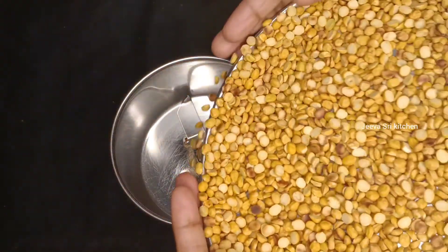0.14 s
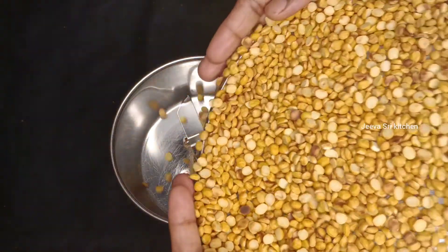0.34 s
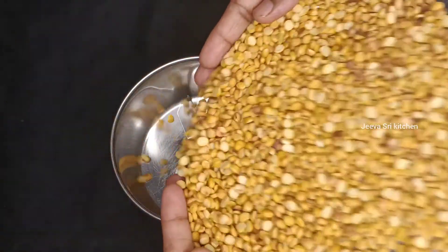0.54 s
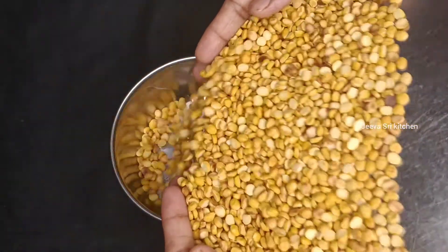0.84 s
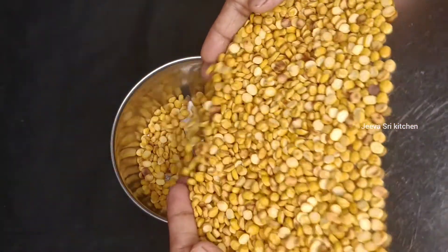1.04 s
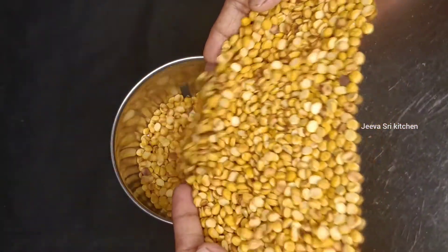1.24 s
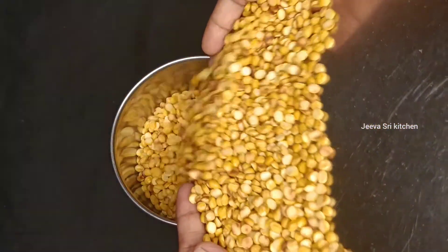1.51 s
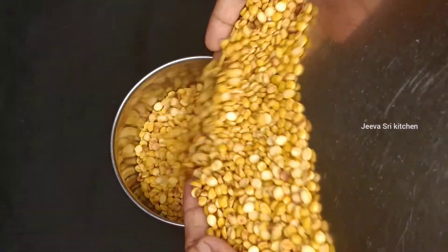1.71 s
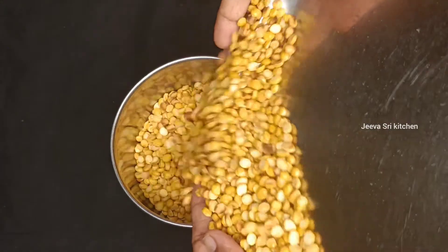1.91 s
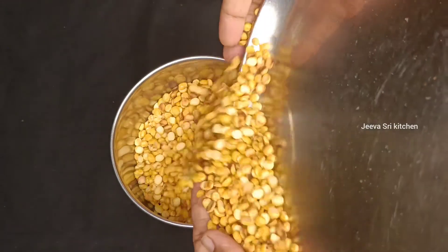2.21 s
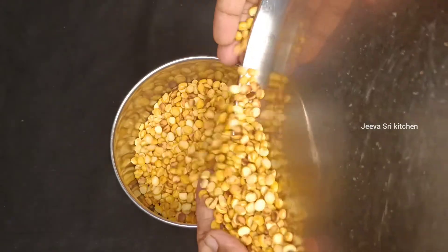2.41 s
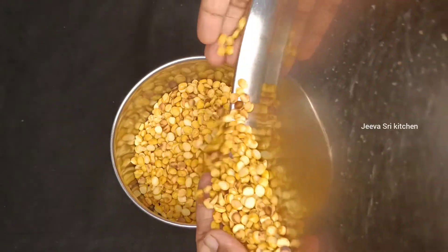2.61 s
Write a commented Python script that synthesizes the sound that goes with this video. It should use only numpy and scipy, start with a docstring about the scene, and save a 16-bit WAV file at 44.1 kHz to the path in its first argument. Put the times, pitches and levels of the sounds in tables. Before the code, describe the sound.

A close stereo pickup of dried lentils pouring into a bare metal jar in a quiet kitchen, starting with muffled counter bumps and scattered sharp clicks, swelling to a hissing, ringing rush, then tapering to fewer ticks.

```python
"""Soft bumps come through a counter in a quiet kitchen, then dry lentils slide off a tilted steel
bowl into a metal jar, heard by a two-port microphone. The slide is a dense random train of noise
bursts; landing seeds make sharp ticks. The bare jar rings as decaying modes until it fills, the air
in both vessels rumbles round rising resonances, and the bumps excite the counter's low modes.
Diffuse tails of decaying noise supply the echoes."""
import sys
import numpy as np
from scipy import signal
from scipy.fft import rfft, irfft, next_fast_len
from scipy.io import wavfile
from scipy.ndimage import uniform_filter1d

SR = 44100
rng = np.random.default_rng(int(sys.argv[2]) if len(sys.argv) > 2 else 0)


def makeup_ratio(level_db):
    """Linear amplitude ratio for a level in decibels (20 dB per factor of ten)."""
    decades = np.asarray(level_db, float) / 20
    return 10 ** decades


def digitize_waveform(pressure):
    """Quantize a signal to 16-bit integers and store it at the path in sys.argv[1].

    Rows of a 2-D input are taken as channels; values are limited to [-1, 1].
    """
    field = np.atleast_2d(pressure).T
    bounded = np.clip(field, -1, 1)
    quanta = np.round(bounded * 32767).astype(np.int16)
    wavfile.write(sys.argv[1], SR, quanta)


N = 121275  # samples


def evened(x):
    """Normalisation: scales a signal to unit rms."""
    return x / np.sqrt(np.mean(x ** 2) + 1e-20)


def curve(table, column):
    """Amplitude envelope: gain over time interpolated from one dB column."""
    table = np.array(table)
    return makeup_ratio(np.interp(np.arange(N) / SR, table[:, 0], table[:, column]))


def read(points, hz, column=1):
    """Spectral interpolation along a logarithmic frequency axis."""
    points = np.array(points)
    return np.interp(np.log(hz + 1), np.log(points[:, 0] + 1), points[:, column])


def drift(size):
    """Low-pass random modulation, smooth over size x 100 samples."""
    slow = evened(uniform_filter1d(rng.standard_normal(N // 100 + 2), size))
    return np.interp(np.arange(N) / 100, np.arange(len(slow)), slow)


def add(out, s, db, part):
    """Superposition: mixes in a short sound scaled to a peak level."""
    start = round(s * SR)
    out[:, start:start + part.shape[1]] += makeup_ratio(db) * part / abs(part).max()


# Relative colour of the two ports: pitch_hz [Hz], left_db [dB], right_db [dB]
PORT_COLOUR = [(300, -28, -26), (800, -22, -20), (1400, -26, -24), (2000, -19, -23), (2900, -15, -15),
               (4300, -17, -21), (5500, -13, -16), (6700, -8, -23), (7300, -12, -15), (8000, -22, -6),
               (9300, -20, -8), (10200, -10, -9), (12000, -14, -9), (12700, -6, -9), (13900, -1, -14),
               (15100, 0, -19), (15750, -2, -36)]


def coloured(x, tilt):
    """Minimum-phase filtering: the port colour plus the source's own tilt, causal in each channel."""
    hz = abs(np.fft.fftfreq(2048, 1 / SR))
    level_db = np.array([read(PORT_COLOUR, hz, column=c) + read(tilt, hz) for c in (1, 2)])
    log_gain = np.log(makeup_ratio(level_db))
    # The Hilbert transform of the log gain supplies the minimum phase.
    spectrum = np.exp(np.conj(signal.hilbert(log_gain)))
    taps = np.fft.ifft(spectrum).real[:, :1024]
    return signal.oaconvolve(x, taps, axes=1)[:, :N]


def strikes(per_s, spread_db):
    """Random impulse process: sparse clicks of random sign, sizes spread exponentially in dB."""
    size = makeup_ratio(spread_db * np.minimum(rng.exponential(1, N), 4))
    return size * rng.choice([-1., 1.], N) * (rng.random(N) < per_s / SR)


ALIKE = 0.47  # weight of the noise shared by both ports of a burst (left-right correlation about 0.22)
RISE_S = 0.00021  # rise time constant: a seed lands with a tiny scatter


def bursts(t60, count):
    """Exponential decay: noise bursts of unit energy per port, each with its own bumpy colour."""
    t = np.arange(1200) / SR
    noise = rng.standard_normal((count, 3, 1200))
    ports = ALIKE * noise[:, :1] + np.sqrt(1 - ALIKE ** 2) * noise[:, 1:]
    decay_s = t60 * rng.uniform(0.7, 1.8, (count, 1, 1))
    ports = ports * makeup_ratio(-60 * t / decay_s) * (1 - np.exp(-t / RISE_S))
    return ports / np.linalg.norm(ports, axis=2, keepdims=True)


def patter(clicks, t60, tilt, count=48):
    """Convolution: each click starts one burst picked at random from a set."""
    pick = rng.integers(0, count, N)
    size = next_fast_len(N + 1200)
    spectrum = sum(rfft(clicks * (pick == k), size) * rfft(burst, size)
                   for k, burst in enumerate(bursts(t60, count=count)))
    return coloured(irfft(spectrum, size)[:, :N], tilt)


RING_T60 = 0.0096  # s; seeds damp the steel
DETUNE = .007  # largest share of pitch by which a spot rings off


def tone(hz, left_db, right_db, luck):
    """Damped modal vibration: one mode, a little detuned, with its own phase in each port."""
    t = np.arange(2000) / SR
    level = makeup_ratio(np.array([[left_db], [right_db]]) - 60 * t / RING_T60)
    pitch_hz = hz * (1 + DETUNE * (2 * luck[0] - 1))
    return level * np.sin(2 * np.pi * (pitch_hz * t + luck[1:, None]))


def ringing(clicks, modes):
    """Modal superposition: each strike drives each mode by a different amount, at six spots."""
    out = 0
    for mode in modes * 6:
        drive = (clicks * rng.standard_normal(N))[None]
        out = out + signal.oaconvolve(drive, tone(*mode, rng.random(3)), axes=1)[:, :N]
    return out


ROOM_DB = -53.5  # rms level of the murmur
# Relative spectrum of the murmur: pitch_hz [Hz], level_db [dB per Hz]
MURMUR = [(20, -1.5), (75, -12.5), (109, 5), (135, -11), (199, 3.5), (281, -13), (531, -10.5), (1800, -47)]
# Left-right likeness of the murmur, 1 = identical: pitch_hz [Hz], likeness [ratio]
MURMUR_ALIKE = [(30, 1), (100, 1), (600, 1)]


def room():
    """Stationary filtered noise: the low kitchen murmur of air and appliances."""
    hz = np.fft.rfftfreq(N, 1 / SR)
    a, b = rfft(rng.standard_normal((2, N)))
    same = np.clip(read(MURMUR_ALIKE, hz), -1, 1)
    ports = np.array([a, same * a + np.sqrt(1 - same ** 2) * b])
    return makeup_ratio(ROOM_DB) * evened(irfft(ports * makeup_ratio(read(MURMUR, hz)), N))


BUMP_RISE_S = .03
KNOCK_S, KNOCK_DB, KNOCK_WIDTH_S = .3465, -20, 0.00007  # one dull click
# Soft bumps as the bowl shifts: start_s [s], level_db [dB], brightness [dB per octave about 200 Hz]
BOWL_BUMPS = [(.005, -45, 8.5), (0.034, -37, -1), (.11, -42, 9.5), (0.149, -34, 6.5), (.18, -31.5, 3.5),
              (0.218, -38, 4.5), (.28, -44, 8.5)]
# Low modes of the counter: pitch_hz [Hz], level_db [dB against the bump], t60_s [s]
COUNTER_MODES = [(116.2, 10.5, 0.18), (176.4, -2, 0.27), (191.2, -3.5, 0.47), (232, 0.5, 0.26),
                 (311, -4.5, 0.18), (353.4, 4.5, 0.098), (402.5, 1, 0.11), (468.2, -10.5, 0.31),
                 (755, -8, 0.078)]


def counter():
    """Modal excitation: bumps swell and die in the counter's low modes; a Gaussian pulse clicks."""
    t, out = np.arange(N) / SR, np.zeros((2, N))
    port = np.array([[0], [1]])
    for (s, db, bright_db), luck in zip(BOWL_BUMPS, rng.random((10, len(COUNTER_MODES), 2))):
        u = np.clip(t[:SR] - s, 0, None)  # time since the bump
        swell = np.sin(np.pi / 2 * np.minimum(u / BUMP_RISE_S, 1)) ** 2
        for (hz, mode_db, t60), (a, b) in zip(COUNTER_MODES, luck):
            level = makeup_ratio(db + mode_db + bright_db * np.log2(hz / 200) - 60 * u / t60) * swell
            # The ports differ in phase, more so at higher pitch.
            cycles = hz * u + a + port * (b - .5) * hz / 1500
            out[:, :SR] += level * np.sin(2 * np.pi * cycles)
    return out - makeup_ratio(KNOCK_DB) * np.exp(-((t - KNOCK_S) / KNOCK_WIDTH_S) ** 2)


ECHO_DB, ECHO_T60 = -6, 0.073  # dB, s


def echoes(x):
    """Diffuse reverberation from counter and walls, as a short tail of decaying noise."""
    t = np.arange(SR // 4) / SR
    tails = rng.standard_normal((4, 2, len(t))) * makeup_ratio(-60 * t / ECHO_T60) * (t > .003)
    out = 0
    # Four unrelated noise tails crossfade in a fixed rotation, keeping the echo smooth.
    for k, tail in enumerate(tails):
        turn = ((np.arange(N) / 800 + k) % 4) / 2  # the tail is fed while this is below 1
        feed = x * abs(np.sin(np.pi * np.clip(turn, 0, 1)))
        out = out + signal.oaconvolve(feed, tail / np.linalg.norm(tail[0]), axes=1)[:, :N]
    return makeup_ratio(ECHO_DB) * out


WANDER, SKIRT = .012, 8  # rms share of pitch; breadth of the wider resonance, times width
GUST_DB = 2  # rms unevenness


def resonate(x, hz, width):
    """Heterodyne resonance: a one-pole filter of given width [Hz] that follows the curve hz."""
    turn = np.exp(2j * np.pi * np.cumsum(hz) / SR)
    r = np.exp(-np.pi * width / SR)
    return (turn * signal.lfilter([1 - r], [1, -r], x / turn)).real


def hollow(slide, first_hz, last_hz, width):
    """Cavity resonance: air in a vessel rumbles unevenly round a wandering, rising peak."""
    hz = np.linspace(first_hz, last_hz, N) * (1 + WANDER * drift(size=60))
    gusts = makeup_ratio(GUST_DB * drift(size=30))
    drive = gusts * patter(slide, 0.014, [(300, 0), (2000, 0)], count=2)
    return evened(resonate(resonate(drive, hz, width), hz, SKIRT * width))


HIT_T60 = .011  # s, before each burst's own scatter
# Loud single seeds: start_s [s], level_db [dB, tick peak], low_ring_db [dB against the tick],
# high_ring_db [dB against the tick]
LOUD_SEEDS = [(0.279, -5, -29, -34), (0.295, -4.5, -14, -21), (0.3114, -13.5, -5, -3),
              (0.329, 2.5, -17, -14), (.3456, -4.5, -21, -20), (0.3882, -3.5, -17, -7), (0.4, -6, -26, -28),
              (0.423, 1.5, -21, -10), (.456, -12.5, -2, 7), (0.5306, -5, -30, -24), (.5402, -11, -26, -20),
              (0.562, 1, -25, -17), (0.6144, -2, -2, -16), (0.655, 1.5, -10.5, -12),
              (1.0258, -4, -3.5, -23), (1.1465, -5.5, 0, -15), (1.1639, -14, 2.5, 1),
              (1.2185, -11.5, 7.5, -3), (1.271, -7, 4, -6), (1.2916, -10, -11, -1),
              (1.3332, -2, -1.5, -6.5), (1.371, -0.5, -8, -9), (1.4014, -15, -13, 1), (1.4603, -19, -14, 7),
              (1.7435, -3, -31, -25), (1.7517, -2, -28, -27), (1.8932, 2.5, -29, -26),
              (1.9258, -13, -18, -21), (2.0073, -3, -21, -31), (2.0194, -6, -28, -25),
              (2.0347, 1.5, -24, -28), (2.074, -0.5, -18, -21), (2.096, 3, -24, -23),
              (2.1343, 3.5, -23, -25), (2.2073, -22, -24, -28), (2.2512, -5, -20, -24),
              (2.27, -4.5, -24, -20), (2.412, -3, -25, -16), (2.4397, -4.5, -20, -20),
              (2.4688, 0, -36, -30), (2.706, -6, -18, -19)]
# Duller, broader knocks of seeds, alone or beside a loud tick: start_s [s], level_db [dB, peak]
DULL_KNOCKS = [(0.2276, -12), (.3121, -1), (2.1366, -4)]
# Ring modes of the jar, relative levels: pitch_hz [Hz], left_db [dB], right_db [dB]
JAR_MODES = [(7843, -3.5, 6.5), (9420, -1, 5), (8460, -46, 5.5), (14350, -1.5, -31), (14800, 2, -34)]
# Relative colour of the ticks: pitch_hz [Hz], level_db [dB]
TICK_COLOUR = [(2500, -41), (7000, -9), (11500, -1), (14000, -2)]
# Relative colour of the duller knocks: pitch_hz [Hz], level_db [dB]
KNOCK_COLOUR = [(1800, -31), (3500, 15), (9000, 5.5)]


def hits():
    """Impact excitation: loud seeds give a bright tick and two jar rings; a few knocks are duller."""
    out, shapes = np.zeros((2, N + 2000)), bursts(HIT_T60, count=70)
    for (s, db, low_db, high_db), shape, luck in zip(LOUD_SEEDS, shapes, rng.random((70, 2, 3))):
        add(out, s, db, coloured(shape, TICK_COLOUR))
        add(out, s, db + low_db, tone(*JAR_MODES[0], luck[0]))
        add(out, s, db + high_db, tone(*JAR_MODES[1], luck[1]))
    for (s, db), shape in zip(DULL_KNOCKS, shapes[::-1]):
        add(out, s, db, coloured(shape, KNOCK_COLOUR))
    return out[:, :N]


# Strikes per second, spread in dB, and t60 in s before each burst's own scatter
HISS_PER_S, HISS_SPREAD_DB, HISS_T60 = 6000, 2.5, 0.007
TICKS_PER_S, TICK_SPREAD_DB, TICK_T60 = 500, 3, .011
RINGS_PER_S, RING_SPREAD_DB = 330, -2
CLUMP_DB = 1  # rms bunching
# Levels of the pour: start_s [s], hiss_db [dB], ticks_db [dB], jar_ring_db [dB]
POUR_LEVELS = [(.07, -48.5, -53, -77), (.105, -34.5, -29.5, -64), (.2, -37.5, -43.5, -62),
               (.3, -33.5, -25.5, -54), (.45, -36, -22.5, -38.5), (.62, -30, -18.5, -28.5),
               (.74, -30.5, -15.5, -23.5), (.9, -29.5, -14.5, -26), (1.1, -32, -21, -24.5),
               (1.35, -31, -16.5, -22), (1.55, -32.5, -22, -28), (1.8, -34, -24, -29.5),
               (2.05, -36, -21.5, -43.5), (2.25, -35.5, -26.5, -37), (2.38, -39, -29, -44),
               (2.75, -44.5, -34.5, -43)]
# Relative colour of the sliding hiss: pitch_hz [Hz], level_db [dB]
HISS_COLOUR = [(1000, 4), (4000, 9), (7000, 6.5), (16000, -22.5)]
# Ring modes of the bowl, relative levels: pitch_hz [Hz], left_db [dB], right_db [dB]
BOWL_MODES = [(6160, -1.5, -11), (6663, 2.5, -24), (10050, -1.5, -0.5)]
# The emptying bowl rings more freely until the sliding thins: start_s [s], level_db [dB against hiss]
BOWL_RING_LEVELS = [(0, -8), (2.2, 1), (2.36, -10)]
# Air resonances of jar and bowl, rising as the jar fills and the bowl tips:
# first_pitch_hz [Hz], last_pitch_hz [Hz], width_hz [Hz]
AIR_PEAKS = [(505, 555, 40), (960, 1010, 30)]
# Levels of the hollows: start_s [s], jar_db [dB], bowl_db [dB]
AIR_LEVELS = [(0, -47.5, -64), (.55, -57.5, -62), (.7, -50, -52), (.93, -45.5, -62), (1.2, -52, -55.5),
              (1.9, -54, -50), (2.45, -62.5, -54), (2.75, -74, -65)]


def pour():
    """Granular flow: bunched random impacts drive hiss, bowl ring, ticks, jar ring and both hollows."""
    bunch = makeup_ratio(CLUMP_DB * drift(size=12))  # seeds leave the lip in bunches
    slide = bunch * strikes(HISS_PER_S, HISS_SPREAD_DB)
    land = bunch * strikes(TICKS_PER_S, TICK_SPREAD_DB)
    jar_strikes = bunch * strikes(RINGS_PER_S, RING_SPREAD_DB)
    bowl = curve(BOWL_RING_LEVELS, column=1) * evened(ringing(slide, BOWL_MODES))
    hiss = evened(patter(slide, HISS_T60, HISS_COLOUR))
    ticks = evened(patter(land, TICK_T60, TICK_COLOUR))
    jar = evened(ringing(jar_strikes, JAR_MODES))
    air = sum(curve(AIR_LEVELS, column=1 + k) * hollow(slide, *peak)
              for k, peak in enumerate(AIR_PEAKS))
    sliding = curve(POUR_LEVELS, column=1) * (hiss + bowl)
    landing = curve(POUR_LEVELS, column=2) * ticks + curve(POUR_LEVELS, column=3) * jar
    return sliding + landing + air


LEFT_LAG_S = .0001  # the jar stands nearer the right port


def scene():
    """Superposition of all sources, with an arrival-time difference between the ports."""
    near = pour() + hits()
    near = np.array([np.roll(near[0], round(LEFT_LAG_S * SR)), near[1]])
    return near + echoes(near) + counter() + room()


def band_limit(x):
    """A steep low-pass at the top of the band."""
    return signal.sosfilt(signal.butter(12, 16970, fs=SR, output="sos"), x)


EDGE_HZ = 15790


def record(dry):
    """Band limitation: a steep linear-phase low-pass filter removes the extreme treble."""
    edge = signal.firwin(1201, EDGE_HZ, window=("kaiser", 9), fs=SR)
    mix = signal.oaconvolve(dry, edge[None], "same")
    return band_limit(mix)


dry = scene()
out = record(dry)
digitize_waveform(out)
```